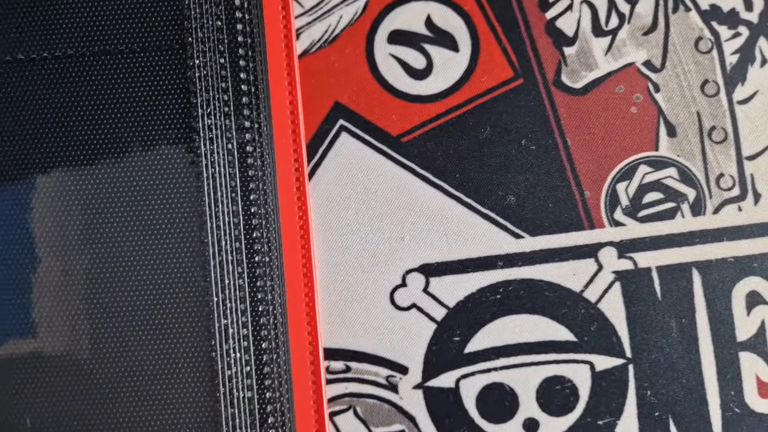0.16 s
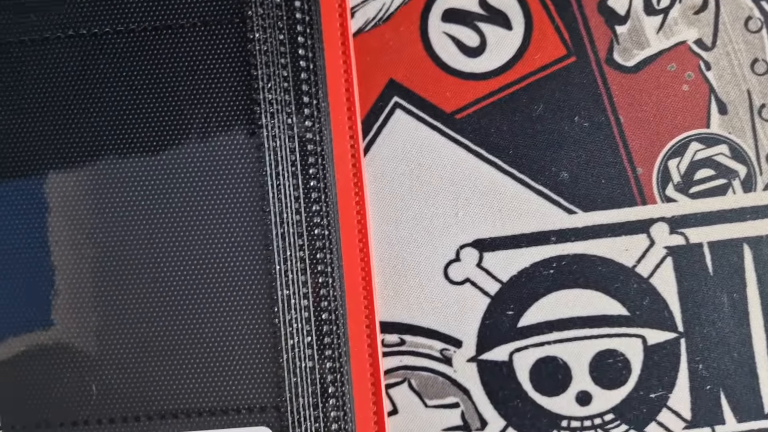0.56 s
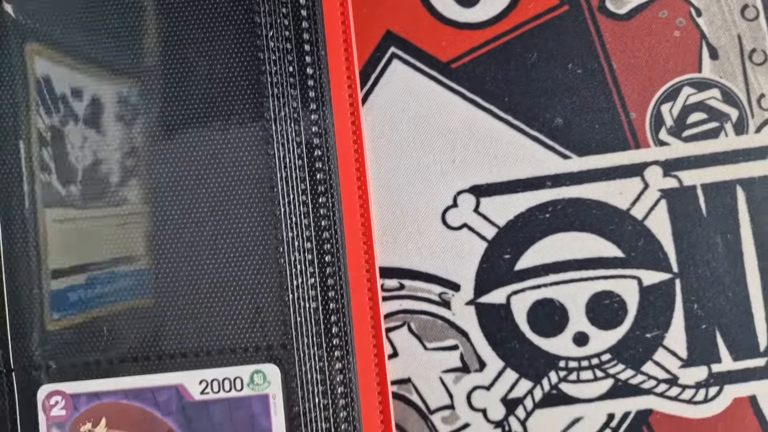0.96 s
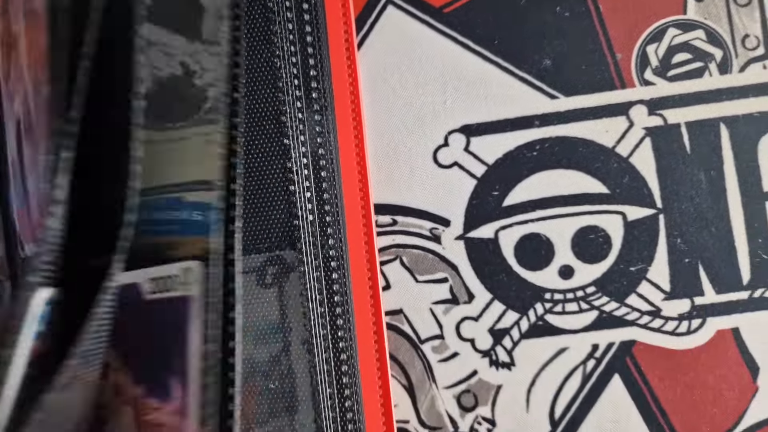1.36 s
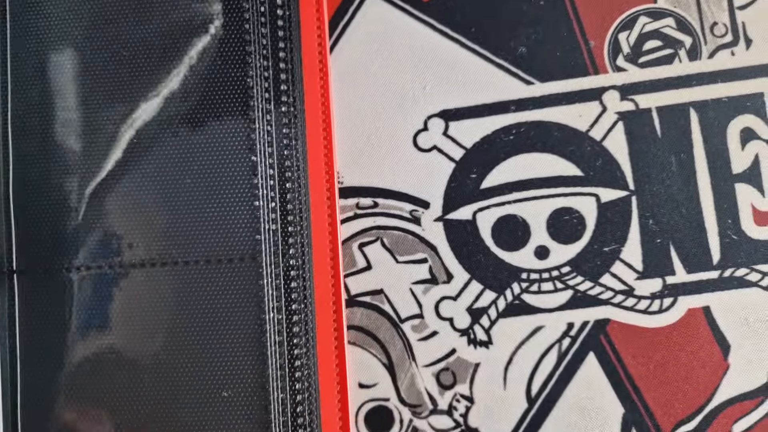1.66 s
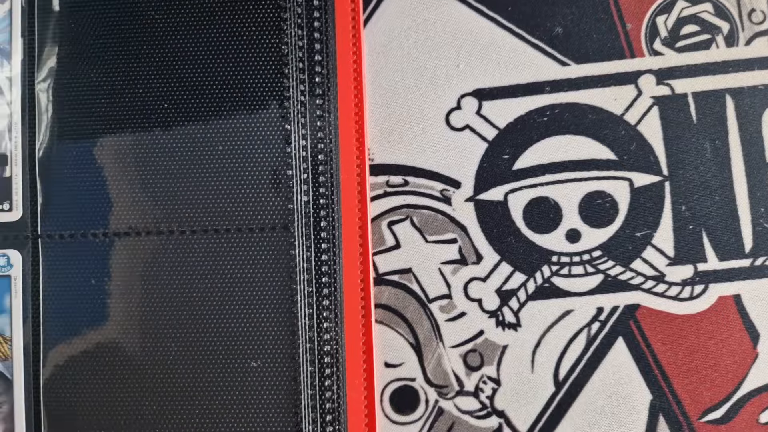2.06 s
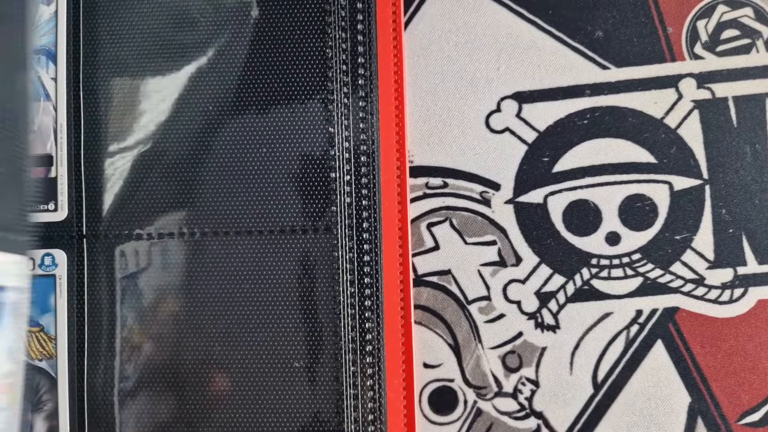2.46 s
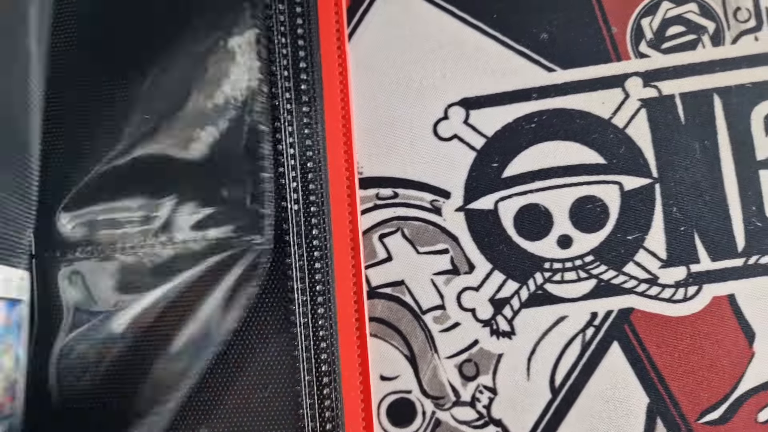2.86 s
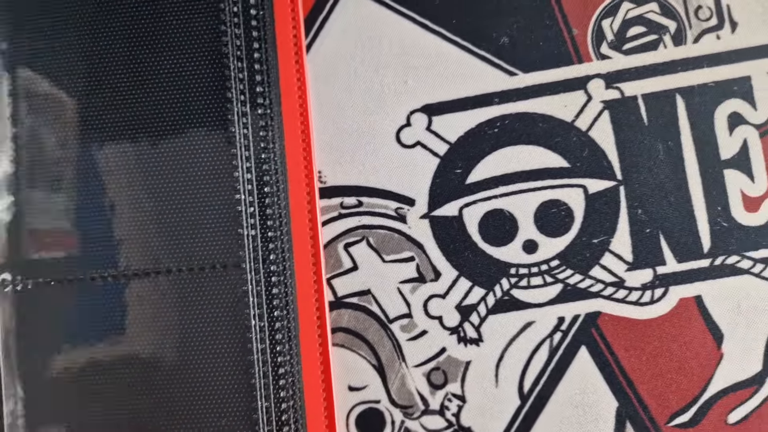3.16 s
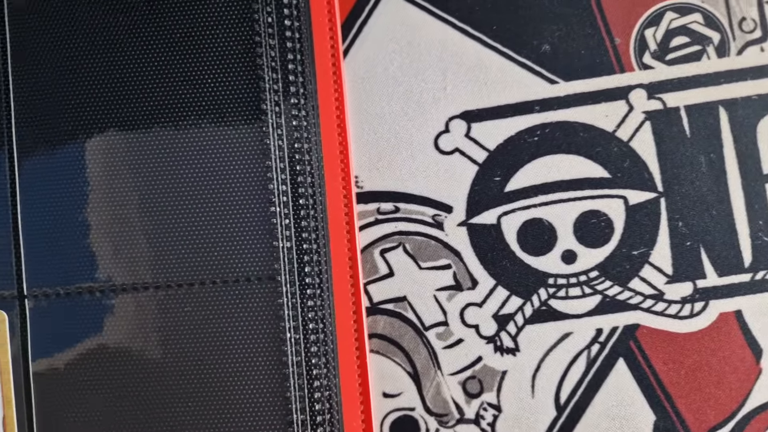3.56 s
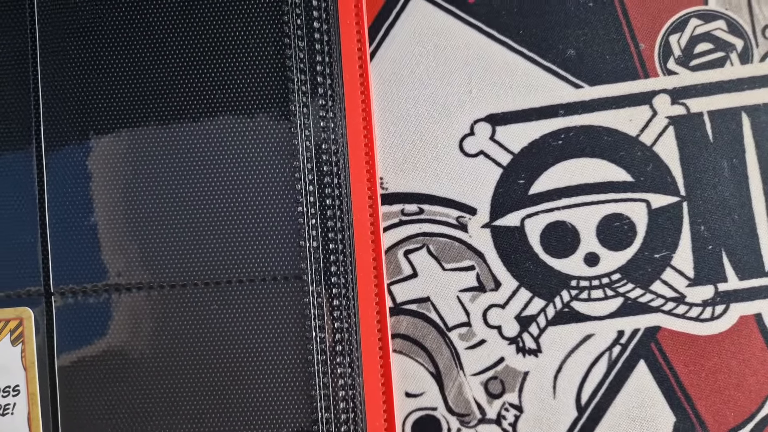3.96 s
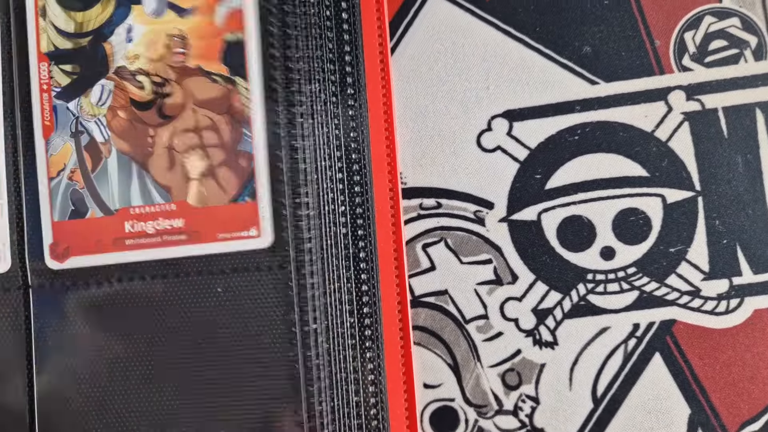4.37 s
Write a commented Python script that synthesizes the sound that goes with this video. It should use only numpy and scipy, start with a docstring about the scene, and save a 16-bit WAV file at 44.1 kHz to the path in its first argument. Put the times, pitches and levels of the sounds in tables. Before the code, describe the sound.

Plastic pocket pages are handled on a table, close and slightly left in stereo, in a small room with a short echo and a faint, low, wavering hum. A bright rustle and strong breathy scrapes open the first 0.3 seconds, with soft low bumps. Quieter flexing follows until short scrapes at about 0.75 and 1.0 seconds. Light ticks lead to a sharp snap at 1.5, then a tight crackling cluster around 1.7. Crisp, uneven scrapes continue to 2.1. It becomes sparser, with small clicks, dull thuds and light rubbing, until a rapid burst of hard, bright snaps just before 3.0. Scraping swells at 3.1, and one loud snap stands out at 3.2. Strong rubbing around 3.4 thins out after 3.5, leaving near quiet around 3.8 to 4.1. Brisk scrapes return, strongest near 4.3, with small clicks and a final rub and soft knock at 4.5.

```python
"""Plastic pocket pages of a binder are slid, lifted and turned on a table, close to the left of two microphones.
Over a steady hum and patchy room noise, a bright rustle and strong scrapes of film (modulated noise) open the scene.
Sharp snaps (short wide-band bursts) crowd together from 1.5 to 1.7 s, and strong scrapes run on to 2.1 s.
A sparser stretch follows; hard snaps return near 3 s and a single one stands out at 3.2 s.
Scrapes thin out after 3.5 s and return after 4.1 s; soft thuds (damped sines) and table rumble run through it all."""
import sys
import numpy as np
from scipy import signal
from scipy.fft import rfft, irfft, next_fast_len
from scipy.io import wavfile
from scipy.ndimage import uniform_filter1d

SR = 44100
rng = np.random.default_rng(int(sys.argv[2]) if len(sys.argv) > 2 else 0)


def linear_from_db(decibels):
    """Turn decibels (scalar or array-like) into linear amplitude factors; 0 gives 1."""
    return 10 ** (np.asarray(decibels, float) / 20)


def transcribe(signal):
    """Save signal, clipped to [-1, 1], as a 16-bit WAV file at the path in sys.argv[1]."""
    frames = np.atleast_2d(signal).T
    limited = np.clip(frames, -1, 1)
    pcm = np.round(limited * 32767).astype(np.int16)
    wavfile.write(sys.argv[1], SR, pcm)


N = 198567

# Strokes of film on film: (start [s], swell [s], fade [s], scrape level [dB],
# treble sheen at the start of the fade [dB re scrape], page flex [dB re scrape])
STROKES = [(-0.032, 0.014, 0.13, -43, -4, -3.5), (0.081, 0.088, 0.2, -39, 1.5, -7.5),
           (0.16, 0.05, 0.16, -40, -0.5, -6), (0.266, 0.066, 0.38, -58.9, -20, 4),
           (0.352, 0.033, 0.15, -58, -17, 7.5), (0.423, 0.11, 0.56, -68.5, -5.5, -4),
           (0.558, 0.041, 0.14, -65.5, -9, 6.5), (0.718, 0.013, 0.31, -64.5, -3, -9),
           (0.75, 0.008, 0.17, -41.5, -7, -10), (0.75, 0.051, 0.052, -37.6, -1, -12.5),
           (0.829, 0.0092, 0.31, -56.5, -15, -7), (0.893, 0.012, 0.15, -53.5, 0, 8.5),
           (0.928, 0.092, 0.064, -58, -5, 10.5), (0.976, 0.074, 0.062, -42.5, -12.5, -3),
           (1.051, 0.002, 0.253, -62, 0, -13), (1.119, 0.057, 0.283, -67.5, 2, -10),
           (1.168, 0.03, 0.13, -52.5, 6.5, -8), (1.189, 0.042, 0.063, -53.9, -13, -9),
           (1.256, 0.061, 0.095, -72.0, -6, -11), (1.305, 0.023, 0.2, -63, -1, -6),
           (1.37, 0.06, 0.654, -66, -1, 2), (1.421, 0.056, 0.089, -46.5, -18, -8),
           (1.472, 0.071, 0.235, -53, 2.5, -9), (1.537, 0.088, 0.37, -49, -4, -13),
           (1.606, 0.033, 0.348, -50.5, -16, -12), (1.684, 0.036, 0.18, -41, 5.5, -9),
           (1.733, 0.053, 0.1, -45.4, 4.5, -4), (1.771, 0.069, 0.083, -47.5, 6.5, -5),
           (1.856, 0.027, 0.302, -56.7, 2, -3), (1.923, 0.047, 0.11, -39, 2, -9),
           (1.986, 0.068, 0.12, -41.5, 0, -2), (2.056, 0.077, 0.085, -44, -6.5, -11),
           (2.151, 0.02, 0.53, -80, 9, 0), (2.313, 0.099, 0.086, -53.5, -6, -2),
           (2.432, 0.039, 0.67, -64.5, -6, -6), (2.571, 0.03, 0.174, -53.5, -5, 1.5),
           (2.6, 0.084, 0.16, -57, 0.5, -7.5), (2.724, 0.013, 0.065, -68.5, 0, 2),
           (2.769, 0.084, 0.2, -65.5, -14, -13), (2.883, 0.043, 0.143, -63, -7.5, 6),
           (2.935, 0.057, 0.13, -46.5, 7, -9.5), (3.004, 0.037, 0.318, -59.5, 2.5, -12.5),
           (3.084, 0.025, 0.18, -50, 3.5, -9.5), (3.101, 0.085, 0.19, -43, 8.5, -7),
           (3.207, 0.0075, 0.11, -44.5, 0.5, -11), (3.294, 0.013, 0.32, -56.5, -11, -12),
           (3.351, 0.026, 0.33, -38.2, -5.5, -5), (3.378, 0.038, 0.142, -43, 6, -11),
           (3.44, 0.077, 0.12, -47, -9, -4), (3.559, 0.072, 0.27, -69, -19, 8),
           (3.628, 0.018, 0.11, -51.5, -21, -7), (3.66, 0.0098, 0.11, -54.5, -19.5, -0.5),
           (3.688, 0.049, 0.15, -66.5, -10, 2), (3.804, 0.014, 0.4, -80.5, -11.5, -4.5),
           (4.156, 0.031, 0.05, -56, -10, 2.5), (4.17, 0.056, 0.097, -51.5, -10, -2.5),
           (4.253, 0.039, 0.123, -71.5, 7, 6), (4.29, 0.035, 0.084, -36, 2, -5.5),
           (4.363, 0.028, 0.67, -57, -7, -9.5), (4.421, 0.042, 0.055, -47, 2, -14),
           (4.49, 0.019, 0.019, -39, -7, 12)]
SWELL_POWER = 0.81  # amplitude grows as time to this power
FADE_DB, FADE_POWER = 33, 0.95  # loss within the fade time, and curvature of the fade
DULLING_DB = 9  # further loss of sheen within the fade time

# Short bursts of film: the first row is the bright rustle that opens the scene, the others are buckling:
# (time [s], peak level at the source [dB], treble sheen [dB])
SNAPS = [(.008, -24.5, 22), (.0201, -28, -24), (.2104, -35, -16), (.4544, -45.5, -28), (.6194, -49, -34),
         (.7527, -26, -6), (.8312, -28.5, -48), (.9057, -38, -9), (.9891, -38.5, -23), (1.0397, -26.5, -7),
         (1.0459, -21.5, 26), (1.058, -25.5, -18), (1.1136, -44, 10), (1.1868, -35, 11), (1.2315, -40, -22),
         (1.2433, -37, -40), (1.3304, -38, -16), (1.4464, -23, -16), (1.4651, -23, -10), (1.4736, -37, -4),
         (1.5078, -33, 3), (1.529, -15, 8), (1.557, -27.5, -15), (1.5668, -28.5, -1), (1.616, -30, 20),
         (1.6363, -26, -24), (1.6613, -28.5, -10), (1.6719, -17, 14), (1.6762, -15, 14.5), (1.681, -18, 4),
         (1.701, -25, 4), (1.7062, -20, 9), (1.71, -22, 7), (1.7164, -18, 14), (1.72, -15.5, 10.5),
         (1.7237, -11, 10.5), (1.842, -29, 7), (1.932, -37, -10), (2.092, -26.5, 14), (2.1373, -34, 20),
         (2.4098, -24, 34), (2.4177, -41, -20), (2.5864, -38.5, -13), (2.6163, -33.5, -31),
         (2.669, -33, -12), (2.7352, -44, -12), (2.7962, -41.5, -67), (2.9113, -51, -6.5),
         (2.9393, -34, 4.5), (2.9541, -15, 5), (2.964, -11, 12), (2.9738, -12.5, 11), (2.977, -8.5, 29),
         (2.9805, -12, 20), (2.9837, -17.5, 3), (3.0934, -35.5, 7.5), (3.2158, -3, 12), (3.3108, -32, -8),
         (3.3716, -30.5, -11.5), (3.6383, -38.5, -19), (3.6739, -37.5, -42), (4.1787, -31, -4),
         (4.2096, -43, -26), (4.273, -53, -50), (4.2935, -30, -5), (4.3498, -24.5, -4),
         (4.4074, -39.5, -26), (4.4493, -29.5, -7)]
SNAP_T60_S = 0.002

# Soft knocks of the pages on the cover: (time [s], level before doubling [dB], frequency [Hz],
# t60 [s], limited to four cycles)
THUDS = [(0.186, -33.5, 160, 0.039), (0.211, -26.5, 68, 0.022), (0.831, -35.5, 130, 0.064),
         (0.905, -39, 196, 0.088), (1.058, -39.5, 70.4, 0.046), (1.519, -39.5, 60.5, 0.072),
         (1.879, -34.5, 232, 0.067), (2.383, -53, 75.4, 0.13), (2.421, -39.5, 153, 0.039),
         (2.643, -49.5, 86, 0.017), (2.664, -35.5, 40.4, 0.032), (3.218, -36, 78.1, 0.077),
         (3.369, -42, 142, 0.05), (4.494, -31, 295, 0.02)]

# The hand shifts its weight and the table rumbles: (time [s], level [dB])
JOLTS = [(0, -42), (.11, -45.5), (.21, -43), (.29, -50), (.84, -47), (.93, -50), (1.08, -62), (1.21, -51.5),
         (1.529, -44.5), (1.45, -53), (1.64, -50.5), (1.76, -54), (1.95, -51.5), (2.17, -49.5),
         (2.39, -43.5), (2.64, -44), (2.99, -48.5), (3.22, -49.5), (3.37, -49), (3.92, -63), (4.17, -61),
         (4.41, -49.5), (4.5, -47.5)]
JOLT_RISE_DB_PER_S, JOLT_FALL_DB_PER_S = 248, 249.5
RUMBLE_DB = -64.5  # steady floor under the jolts

# Levels of the film's ranges; rim and bite follow the treble in part
BITE_DB, BITE_SHARE = -3.96, 0.38  # bite from sheen, in strokes
RIM_DB, RIM_SHARE = -5.37, 0.5  # rim from bite
BODY_DB, BODY_SHARE = -5, -0.084  # bright sounds carry less body
RING_HZ, RING_WIDTH_HZ, RING_DB = 2194, 320, -12  # the pockets ring: resonance added to the direct spectrum
TOP_TILT = 0.35  # exponent of the rise with frequency above 9 kHz

# Colour of the film at the near (left) microphone: (frequency [Hz], gain [dB])
NEAR_COLOUR = [(30, 0), (200, 0), (700, 0), (1300, 1), (2300, -1), (3400, 2), (4500, 0), (7500, 1),
               (8700, -7), (10500, -1), (13000, -3), (16500, -3)]
# Colour of the film at the far (right) microphone: (frequency [Hz], gain [dB])
FAR_COLOUR = [(30, -2), (200, -4), (700, -5), (1300, 0), (2200, 4), (3200, -1.5), (5500, 1), (6700, -3),
              (7800, -1), (9300, -12), (11300, -13), (12300, -6.5), (16500, -8)]
# Part of the far sound that is coherent with the near: (frequency [Hz], coherence [ratio])
SHARED = [(100, .995), (350, .9), (800, .8), (1300, .57), (3000, .52), (6000, .42), (12000, .42)]
FAR_LAG_S = 0.00051
FAR_LEAD_RAD = 0.74  # phase that the far microphone wins back above the bass

# Decay of the echo: (frequency [Hz], t60 [s])
WALLS = [(200, 0.23), (1000, 0.42), (4000, 0.06), (12000, 0.079)]
WALLS_DB = -17

# Room noise, left, before scaling to AIR_DB: (frequency [Hz], relative density [dB per Hz])
AIR_LEFT = [(25, -13), (55, -1.5), (110, -9.5), (200, 1), (400, -6.5), (700, -13.5), (1400, -30),
            (2800, -36.5), (4500, -48.5), (5600, -36.5), (8400, -26.5), (9000, -50.5), (11000, -58.5),
            (11800, -40), (15500, -39.5), (16000, -76)]
# Room noise, right, before scaling to AIR_DB: (frequency [Hz], relative density [dB per Hz])
AIR_RIGHT = [(25, -8), (55, -2), (110, -10.5), (200, -2), (400, -12), (700, -25.5), (1400, -21),
             (2100, -36), (4000, -64.5), (5600, -61), (7000, -37.5), (15500, -86), (16000, -71.5)]
# Left-right likeness of the room noise, limited to -1..1: (frequency [Hz], correlation [ratio])
AIR_SAME = [(60, 0.99), (240, 0.88), (950, 0.98), (3770, -1.3), (15000, -0.51)]
AIR_DB = -60.5  # rms over both sides
# Wavering drones of a machine: (frequency [Hz], half-width [Hz], rms level midway between the sides [dB])
HUM = [(153.8, 5.1, -62), (333.2, 13.1, -66.5)]


def scrape():
    """Stick-slip friction: film dragging on film hisses in uneven grains, with ticks where it catches."""
    level_db, *colour_db = stroke_curves(np.arange(N) / SR)
    grip = evened(band(rng.standard_normal(N), 16, 350))
    # about 120 catches a second, each dying away with a time constant of 1.2 ms
    tick_size = linear_from_db(1.1 * np.minimum(rng.exponential(1, N), 3))
    ticks = (rng.random(N) < 120 / SR) * tick_size
    catches = signal.lfilter([1], [1, -np.exp(-1 / (0.0012 * SR))], ticks)
    roughness = linear_from_db(1.6 * grip) + 0.4 * catches
    hiss = patchy(rng.standard_normal((2, N)), patchy_db=2.5) * roughness
    return linear_from_db(level_db) * film(hiss, *colour_db)


def stroke_curves(t):
    """Power addition: each stroke swells and fades, and overlapping strokes add, range by range."""
    start, swell, fade, db, sheen_db, flex_db = np.transpose(STROKES)[:, :, None]
    slow = t[::32]
    rising = np.clip((slow - start) / swell, 0, 1) ** SWELL_POWER
    fading = (np.maximum(slow - start - swell, 0) / fade) ** FADE_POWER
    power = (rising * linear_from_db(db - FADE_DB * fading)) ** 2 + 1e-14
    sheen_db = np.maximum(sheen_db - DULLING_DB * fading, -60)
    bite_db = BITE_DB + BITE_SHARE * sheen_db
    total = power.sum(0)
    # each colour is averaged over the strokes, weighted by their power
    colours = [(power * linear_from_db(2 * c)).sum(0) / total for c in (bite_db, sheen_db, flex_db)]
    return [np.interp(t, slow, 10 * np.log10(p)) for p in [total] + colours]


def film(z, bite_db, sheen_db, flex_db):
    """Spectral shaping: the plastic colours noise in five ranges (flex, body, rim, bite, sheen)."""
    hz = np.fft.rfftfreq(z.shape[1], 1 / SR)
    ring = 1 + linear_from_db(RING_DB) / (1 + ((hz - RING_HZ) / RING_WIDTH_HZ) ** 2)
    tilt = np.maximum(hz / 9000, 1) ** TOP_TILT
    spectrum = rfft(z) * ring * tilt
    edges_hz = (340, 1150, 2900, 5000, 8700, 1e6)
    above = [1 / (1 + (edge / (hz + 1)) ** 6) for edge in edges_hz]
    flex, body, rim, bite, sheen = (evened(irfft(spectrum * (lower - upper), z.shape[1]))
                                    for lower, upper in zip(above, above[1:]))
    body_db = BODY_DB + BODY_SHARE * np.maximum(bite_db, -10)
    rim_db = RIM_DB + RIM_SHARE * bite_db
    return (linear_from_db(flex_db) * flex + linear_from_db(body_db) * body + linear_from_db(rim_db) * rim
            + linear_from_db(bite_db) * bite + linear_from_db(sheen_db) * sheen)


def patchy(z, patchy_db):
    """Wandering contact: patches of the spectrum swell and fade within tens of milliseconds."""
    spectra = signal.stft(z, nperseg=256, noverlap=192)[2]
    patches = rng.standard_normal(spectra.shape[1:])
    patches = uniform_filter1d(patches, size=5, axis=0)  # across frequency
    patches = evened(uniform_filter1d(patches, size=16, axis=1))  # along time
    return signal.istft(spectra * linear_from_db(patchy_db * patches), nperseg=256, noverlap=192)[1][:, :N]


def snaps():
    """Impulsive excitation: each row sounds a wide burst of 2 ms with a weak after-rattle five times as long."""
    out, t = np.zeros((2, N)), np.arange(2000) / SR
    fade_db = -60 * t / SNAP_T60_S
    onset = 1 - np.exp(-t / 0.00015)
    envelope = onset * (linear_from_db(fade_db) + linear_from_db(-11.5 + 0.2 * fade_db))
    for s, db, sheen_db in SNAPS:
        noise = rng.standard_normal((2, len(t)))
        burst = film(noise, 0.5 * sheen_db - 0.5, sheen_db, -12.0) * envelope
        add(out, s, linear_from_db(db) * burst / abs(burst).max(1, keepdims=True))
    return out


def thuds():
    """Heavily damped oscillation: a low push with hardly any ring, placed in the first source row."""
    out, t = np.zeros((2, N)), np.arange(8000) / SR
    for s, db, hz, t60 in THUDS:
        t60 = np.minimum(t60, 4 / hz)
        envelope = linear_from_db(db - 60 * t / t60) * (1 - np.exp(-t * hz * 12))
        push = envelope * np.sin(2 * np.pi * hz * t)
        add(out, s, 2 * np.array([push, 0 * push]))
    return out


def table_rumble():
    """Forced low-frequency vibration: band-passed noise follows the jolts of the table."""
    rumble = evened(band(rng.standard_normal((2, N)), 27, 120))
    return rumble_level(np.arange(N) / SR) * rumble


def rumble_level(t):
    """Exponential growth and decay: each jolt builds up and dies away over a steady low rumble."""
    s, db = np.transpose(JOLTS)[:, :, None]
    before, after = np.maximum(s - t, 0), np.maximum(t - s, 0)
    jolt_db = db - JOLT_RISE_DB_PER_S * before - JOLT_FALL_DB_PER_S * after
    return linear_from_db(np.maximum(jolt_db.max(0), RUMBLE_DB))


def walls(x):
    """Reverberation: sparse taps of random sign, each band dying at its own speed."""
    taps = np.zeros((2, SR // 2))
    at = np.arange(120, SR // 2 - 20, 20)
    at = at + rng.integers(0, 20, (2, len(at)))
    np.put_along_axis(taps, at, rng.choice([-1., 1.], at.shape), 1)
    hz, t, z = signal.stft(taps, SR, nperseg=256)
    decay = linear_from_db(-60 * t / read(WALLS, hz)[:, None])
    tail = signal.istft(z * decay, SR, nperseg=256)[1]
    return signal.fftconvolve(x, tail / np.linalg.norm(tail[0]), axes=1)[:, :N]


def microphones(x):
    """Delay and partial coherence: the far side hears it later, shaded, and partly by other paths (row 2)."""
    size = next_fast_len(N + 4096)
    hz, (direct, other) = np.fft.rfftfreq(size, 1 / SR), rfft(x, size)
    shared = np.clip(read(SHARED, hz), 0, 1)
    lead = FAR_LEAD_RAD * hz ** 2 / (hz ** 2 + 200 ** 2)
    delay = np.exp(-1j * (2 * np.pi * hz * FAR_LAG_S - lead))
    far = (shared * direct + np.sqrt(1 - shared ** 2) * other) * delay
    both = [direct * linear_from_db(read(NEAR_COLOUR, hz)), far * linear_from_db(read(FAR_COLOUR, hz))]
    return irfft(both, size)[:, :N]


def room_air():
    """Partly correlated noise: the steady, patchy background of the room, with its two narrow drones."""
    frames, hz = N // 512 + 5, np.fft.rfftfreq(2048, 1 / SR)
    a, b, c, d, patches = rng.standard_normal((5, 1025, frames))
    patches = evened(uniform_filter1d(uniform_filter1d(patches, 12, 0), 8, 1))
    same = np.clip(read(AIR_SAME, hz), -1, 1)[:, None]
    left, separate = a + 1j * b, c + 1j * d
    right = same * left + np.sqrt(1 - same ** 2) * separate
    colour_db = np.array([read(AIR_LEFT, hz), read(AIR_RIGHT, hz)])[:, :, None]
    z = np.array([left, right]) * linear_from_db(colour_db + 1.5 * patches)
    air = linear_from_db(AIR_DB) * evened(signal.istft(z, nperseg=2048, noverlap=1536)[1][:, :N])
    hum = sum(drone(*row) for row in HUM)
    return air + hum * linear_from_db([[1.5], [-1.5]])  # the hum leans left


def drone(hz, width_hz, db):
    """Frequency modulation: a tone of wandering pitch, with some noise around the same pitch."""
    wander = evened(band(rng.standard_normal(N), 2, 5.7))
    tone = np.sin(2 * np.pi * np.cumsum(hz + 0.5 * width_hz * wander) / SR)
    fuzz = evened(band(rng.standard_normal(N), hz - width_hz, hz + width_hz))
    return linear_from_db(db) * evened(tone + 0.36 * fuzz)


def evened(x):
    """Normalisation to an rms of 1."""
    return x / np.sqrt(np.mean(x ** 2) + 1e-20)


def read(points, hz):
    """Interpolation of a table on a log-frequency axis."""
    f, value = np.transpose(points)
    return np.interp(np.log(hz + 1), np.log(f + 1), value)


def band(x, lo_hz, hi_hz):
    """Band-pass filtering along the last axis."""
    return signal.sosfilt(signal.butter(2, [lo_hz, hi_hz], "band", fs=SR, output="sos"), x)


def add(mix, s, sound):
    """Superposition: a two-row sound is added to the mix at time s."""
    part = mix[:, round(s * SR):][:, :sound.shape[1]]
    part += sound[:, :part.shape[1]]


def scene():
    """Superposition of the pages and their echo at both microphones, and the room."""
    pages = scrape() + snaps() + thuds() + table_rumble()
    return microphones(pages + linear_from_db(WALLS_DB) * walls(pages)) + room_air()


def low_pass(x):
    """Removes everything above the highest recorded frequency."""
    return signal.sosfilt(signal.butter(12, 16830, fs=SR, output="sos"), x)


def record(dry):
    """Low-pass filtering: the top of the band, above 15.83 kHz, is nearly shut."""
    edge = signal.firwin(255, 15830, window=("kaiser", 5), fs=SR)
    shut = signal.oaconvolve(dry, edge[None], "same")
    mix = shut + linear_from_db(-38) * (dry - shut)
    return low_pass(mix)


dry = scene()
out = record(dry)
transcribe(out)
```